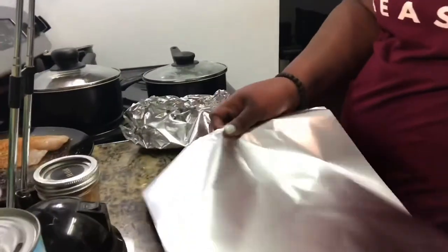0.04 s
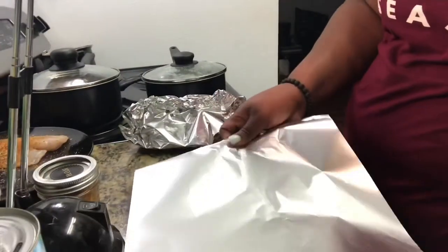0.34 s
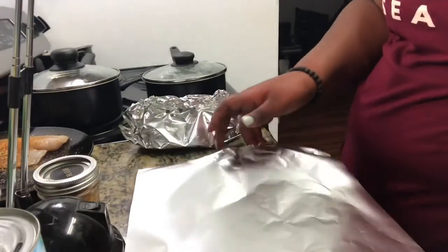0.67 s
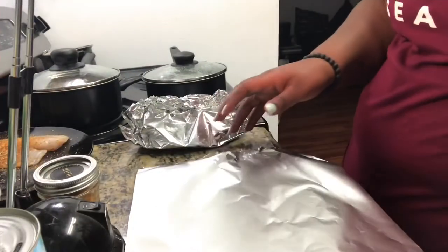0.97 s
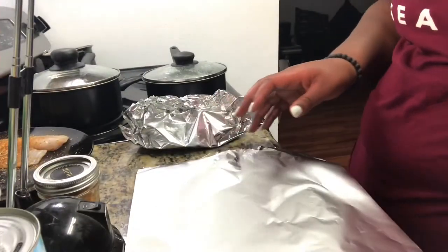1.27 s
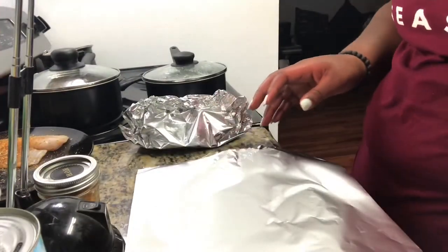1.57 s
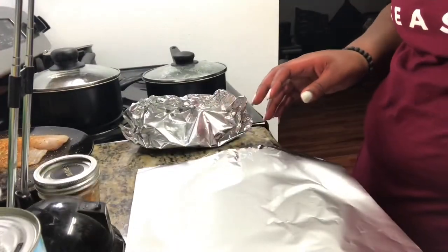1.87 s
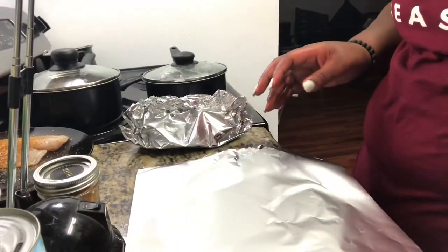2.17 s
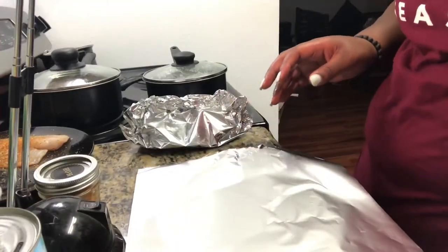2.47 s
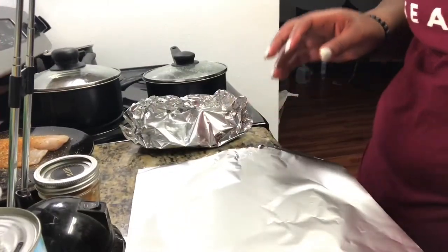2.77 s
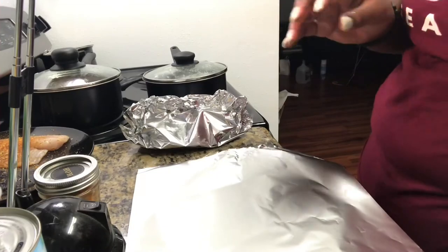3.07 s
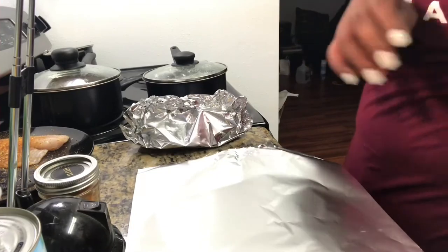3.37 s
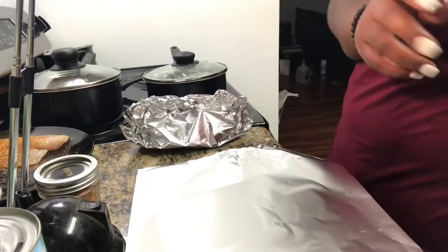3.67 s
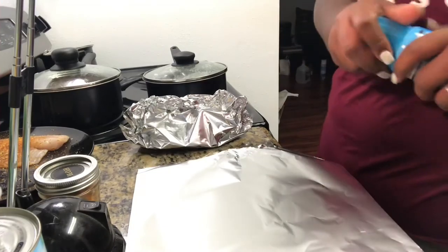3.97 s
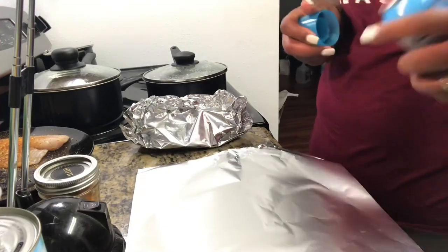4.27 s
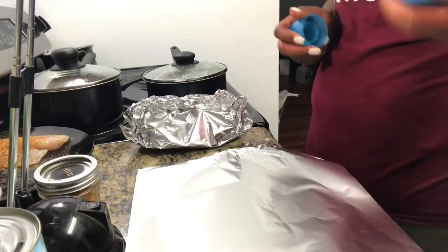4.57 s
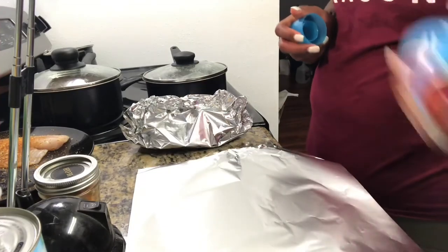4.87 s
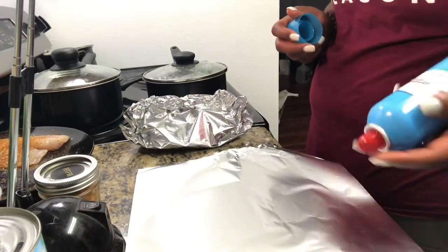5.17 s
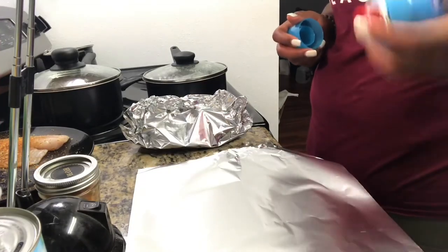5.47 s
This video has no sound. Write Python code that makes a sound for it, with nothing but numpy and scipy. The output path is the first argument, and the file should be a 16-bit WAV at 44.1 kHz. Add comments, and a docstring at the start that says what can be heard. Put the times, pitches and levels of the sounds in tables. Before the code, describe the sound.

A sheet of aluminium foil crinkles in dense, bright snaps as it is laid on a kitchen counter, then rustles and settles. Hard things knock and scrape as a spray can is fetched. Its plastic cap pops off, and the can is swung a few times, liquid swishing inside and the thin metal ticking in the hand. Everything is close, in a small room with a faint fridge hum.

```python
"""A sheet of aluminium foil is laid on a kitchen counter: its creases buckle in dense flurries of snaps,
then it rustles and settles. Hard things knock and scrape as a can of cooking spray is fetched. The cap
pops off and the can is swung: liquid swishes against its wall and the thin metal ticks in the hand.
A fridge hums behind it all, and the small room adds a short reverberation to the handling sounds."""
import sys
import numpy as np
from scipy import signal
from scipy.fft import rfft, irfft, next_fast_len
from scipy.io import wavfile

SR = 44100
rng = np.random.default_rng(int(sys.argv[2]) if len(sys.argv) > 2 else 0)


def digitize_waveform(pressure):
    """Quantize a signal to 16-bit integers and store it at the path in sys.argv[1].

    Rows of a 2-D input are taken as channels; values are limited to [-1, 1].
    """
    field = np.atleast_2d(pressure).T
    bounded = np.clip(field, -1, 1)
    quanta = np.round(bounded * 32767).astype(np.int16)
    wavfile.write(sys.argv[1], SR, quanta)


N = 248283
T = np.arange(N) / SR
AGE = T[:SR // 2]  # seconds since the onset of one event
TOP_HZ = 16200
# Spectrum of a hard contact: frequency_hz, gain_db
CONTACT_SPECTRUM = [(200, -6), (700, 8.5), (1800, 3.5), (3200, 2.5), (6500, -5.5), (10000, -19),
                    (16000, -25)]


def amp(db):
    """Decibels to amplitude ratio."""
    return 10 ** (np.asarray(db) / 20)


def unit(x):
    """Normalisation to rms 1."""
    return x / np.sqrt(np.mean(x ** 2))


def add(out, start_s, x):
    """Superposition of x on out from start_s."""
    i = max(int(start_s * SR), 0)
    out[i:i + len(x)] += x[:N - i]


def fade(t60):
    """Exponential decay, 60 dB down after t60 seconds."""
    return np.exp(-np.log(1000) * AGE / max(t60, 1 / SR))


def swell(length_s):
    """Half-sine envelope."""
    return np.sin(np.pi * np.minimum(AGE / length_s, 1))


def ring(hz, t60):
    """Free vibration of one damped mode."""
    return np.sin(2 * np.pi * hz * AGE) * fade(t60)


def noise():
    """Half a second of white noise."""
    return rng.standard_normal(len(AGE))


def grains(count, rate, spread_db):
    """Shot noise: count samples holding random clicks of unequal size, rate a second."""
    size = amp(spread_db * np.minimum(rng.exponential(size=count), np.pi))
    occurs = rng.random(count) < rate / SR
    return unit(occurs * rng.choice([-1, 1], count) * size)


def between(hz, points):
    """Interpolation of (frequency, value) points on a logarithmic frequency axis."""
    frequency, value = np.transpose(points)
    return np.interp(np.log(hz + 1), np.log(frequency), value)


def colour(x, spectrum, size=8192):
    """Minimum-phase filter with the given spectrum, made causal by folding the cepstrum."""
    gain = amp(between(np.fft.rfftfreq(size, 1 / SR), spectrum))
    cepstrum = irfft(np.log(gain))
    cepstrum[1:size // 2] *= 2
    cepstrum[size // 2 + 1:] = 0
    return signal.fftconvolve(x, irfft(np.exp(rfft(cepstrum))))[:len(x)]


def band(x, low_hz, high_hz, order=2):
    """Band-pass filter."""
    sos = signal.butter(order, [low_hz, min(high_hz, SR / 2 - 1)], "band", fs=SR, output="sos")
    return signal.sosfilt(sos, x)


def shade(x, low_db, treble_db, low_hz=2400, treble_hz=8000):
    """Shelving filters: x is normalised, then its lows and treble are raised or lowered."""
    x = unit(x)
    low = signal.sosfiltfilt(signal.butter(2, low_hz, "low", fs=SR, output="sos"), x)
    treble = signal.sosfiltfilt(signal.butter(2, treble_hz, "high", fs=SR, output="sos"), x)
    return x + (amp(low_db) - 1) * low + (amp(treble_db) - 1) * treble


def resonate(x, modes, ring_db):
    """Forced vibration: a noise plus the ringing it sustains in a body, at rms 1."""
    body = sum(amp(db) * ring(hz, t60) for hz, db, t60 in modes)
    ringing = unit(signal.fftconvolve(x, body)[:len(x)])
    return unit(unit(x) + amp(ring_db) * ringing)


def clatter(hz, t60, loose, blur=0.017):
    """Line broadening: a loose contact turns part of a mode into narrow-band noise just below it."""
    centre_hz = hz * 0.925
    rough = unit(band(noise(), centre_hz / (1 + blur), centre_hz * (1 + blur), order=1))
    return (1 - loose) * ring(hz, t60) + loose * rough * fade(t60)


def crack(t60):
    """Impact transient: a brief, hard contact radiates a broadband burst."""
    return unit(colour(noise(), CONTACT_SPECTRUM)) * fade(t60) / 2


def room(x, wet_db, linger=1):
    """Reverberation: direct sound plus a diffuse tail, whose decay times are scaled by linger."""
    # Reverberation times of the kitchen: frequency_hz, t60_s
    decay_times = [(100, 0.34), (500, 0.22), (2500, 0.3), (7000, 0.22), (16000, 0.11)]
    edges_hz = np.geomspace(120, 20000, 8)
    diffuse = noise()
    tail = sum(band(diffuse, low, high) * fade(linger * between(np.sqrt(low * high), decay_times))
               for low, high in zip(edges_hz, edges_hz[1:]))
    tail *= np.clip((AGE - .002) / .003, 0, 1)  # the nearest surfaces answer after a few ms
    return x + amp(wet_db) * signal.fftconvolve(x, tail / np.linalg.norm(tail))[:N]


def fridge(air_db=-56.5, waver_db=2):
    """Periodic vibration gives a line spectrum: a slightly wavering hum over the rush of the room."""
    # Spectrum of the room's rush: frequency_hz, gain_db
    air_spectrum = [(20, -10), (45, -14), (70, -10), (150, -6.5), (210, -12), (350, -5.5), (560, -18.5),
                    (1050, -19), (1600, -24), (2900, -27), (5400, -31), (7500, -35), (10500, -41),
                    (16000, -40.5)]
    # Mains and compressor tones: pitch_hz, level_db
    hum_lines = [(59.5, -58.5), (120, -64.5), (156.2, -63.5), (292, -76.5), (361, -71.5)]
    out = amp(air_db) * unit(colour(rng.standard_normal(N), air_spectrum))
    knots_s = np.linspace(0, T[-1], 24)
    for hz, db in hum_lines:
        waver = np.interp(T, knots_s, rng.standard_normal(len(knots_s)))
        tone = np.sqrt(2) * np.sin(2 * np.pi * (hz * T + rng.random()))
        out += amp(db + waver_db * waver) * tone
    return out


def knocks():
    """Impact and friction excite the modes of small hard things; the wood thuds under each impact."""
    # Things set down: start_s, ring_db, ring_hz, crack_db, thud_db, thud_hz
    impacts = [(1.2847, -34, 1700, -31.5, -25.5, 233), (1.457, -51, 1100, -32, -28.5, 132),
               (1.675, -41, 980, -30, -37.5, 480), (1.732, -19.5, 1440, -26, -31.5, 362),
               (1.928, -33, 1174, -32.5, -37.5, 304), (1.956, -45, 1110, -36, -25, 291),
               (1.987, -32, 2020, -24, -40, 403), (1.9928, -20.5, 2040, -19.5, -33.5, 383),
               (2.241, -19, 1265, -31, -41, 315), (2.288, -38, 3080, -31.5, -36, 110),
               (2.791, -48, 1526, -24.5, -26.5, 379), (2.83, -34.5, 1150, -36.5, -27.5, 291),
               (2.868, -31, 1140, -43, -33.5, 387), (3.195, -62, 1100, -64, -37, 518)]
    # Modes of a struck thing: pitch_ratio, gain_db
    clack_modes = [(.66, -27), (1, -1), (1.17, -4.5), (2.2, -18)]
    # Things sliding on each other: start_s, level_db, pitch_hz, length_s
    scrapes = [(1.274, -54, 2130, 0.2), (1.554, -50.5, 1480, 0.13), (1.738, -56, 2260, 0.057),
               (1.926, -54.5, 2160, 0.076), (2.234, -52, 2520, 0.088), (3.05, -57.5, 2240, 0.069),
               (4.084, -64.5, 1870, 0.11), (4.227, -62.5, 1860, 0.15)]
    # Modes of a sliding thing: pitch_hz, gain_db, t60_s
    slide_modes = [(1220, 7, 0.013), (1937, -5, 0.086), (2420, 5, 0.016), (3065, 2, 0.046),
                   (3520, -6, 0.055)]
    out = np.zeros(N)
    for start_s, ring_db, hz, crack_db, thud_db, thud_hz in impacts:
        modes = sum(amp(db) * clatter(hz * ratio, t60=0.024, loose=0.53, blur=0.034)
                    for ratio, db in clack_modes)
        clack = amp(ring_db) * modes * (1 - fade(0.0044)) + amp(crack_db) * crack(t60=0.02)
        add(out, start_s, band(clack, 0.58 * hz, TOP_HZ))  # little radiates below the modes
        t60 = 0.088 * (300 / thud_hz) ** 0.29  # deeper thuds ring longer
        rumble = unit(band(noise(), thud_hz * 0.41, thud_hz * 1.43))
        thud = 0.52 * ring(thud_hz, t60) + 0.45 * rumble * fade(t60)
        add(out, start_s, amp(thud_db) * thud * (1 - fade(0.019)))
    for start_s, db, hz, length_s in scrapes:
        scrape = resonate(band(noise(), hz * .5, hz * 2.26), slide_modes, ring_db=-3.5)
        add(out, start_s, amp(db) * scrape * swell(length_s))
    return room(out, wet_db=-8.5, linger=0.81)


def fingers(held_s=3, scuff_db=-66, spread_db=3, low_hz=2200, high_hz=9000, count=64):
    """Friction noise: fingers scuff the held can softly, at random moments and pitches."""
    out = np.zeros(N)
    for when, pitch, force in rng.random((count, 3)):
        hz = low_hz * (high_hz / low_hz) ** pitch
        scuff = unit(band(noise(), hz / 1.12, hz * 1.1, order=1)) * swell(length_s=0.014)
        level_db = scuff_db + spread_db * (2 * force - 1)
        add(out, held_s + when * (T[-1] - held_s), amp(level_db) * scuff)
    return out


def splash(peak_s, rise_s, settle_db_per_s=158):
    """Exponential growth, tenfold in each rise_s, then exponential decay as the fizz dies away."""
    rising = 10 ** (np.minimum(T - peak_s, 0) / rise_s)
    settling = amp(-settle_db_per_s * np.maximum(T - peak_s, 0))
    return np.where(T < peak_s, rising, settling)


def can(swish_db=-0.5, spatter_db=-3, grip=0.88):
    """Shell resonance: liquid, rubs and ticks excite the can's thin wall; the grip damps the ticks."""
    # Modes of the metal wall: pitch_hz, gain_db, t60_s
    wall_modes = [(1360, -4.5, 0.037), (1580, -5.5, 0.029), (1940, -7.5, 0.057), (2446, -1.5, 0.026),
                  (3290, -16.5, 0.083), (3700, -0.5, 0.012), (4200, -16.5, 0.065), (4570, 1.5, 0.024),
                  (6980, -4.5, 0.026)]
    # Spectrum of the liquid: frequency_hz, gain_db
    liquid_spectrum = [(500, -33), (900, -17), (1280, -1), (1550, -9), (2150, -1.5), (2900, -6.5),
                       (3800, 0), (5000, -3), (6700, -4), (9500, -8.5), (16000, -10)]
    # Swings throwing the liquid at the wall: peak_s, level_db, rise_s, treble_db
    swings = [(4.53, -67, .05, 6), (4.68, -53, 0.054, -7), (4.78, -51.5, .06, -3), (4.93, -55.5, 0.062, -5),
              (5.12, -60, 0.058, -5), (5.43, -74, 0.066, 11), (5.523, -50.5, 0.015, 3.5),
              (5.61, -76, 0.0081, 21)]
    # Spectrum of finger friction: frequency_hz, gain_db
    rub_spectrum = [(1000, -24.5), (2400, -12), (3100, -12), (3800, 2.5), (4400, -3), (5400, -7),
                    (7000, -9), (10000, -21.5), (16000, -23)]
    # Fingers rubbing the can: start_s, level_db, treble_db, length_s
    rubs = [(1.463, -33, -2.5, 0.021), (3.408, -52, 9, 0.028), (3.555, -48.5, 10, 0.05),
            (3.701, -51.5, -17, 0.028), (3.728, -57, 0, 0.088), (4.857, -54.5, 11.5, 0.035),
            (5.053, -43, 3, 0.023)]
    # Ticks of the can in the hand: start_s, level_db, relative_crack_db
    ticks = [(3.766, -49, 3), (4.861, -53.5, 18), (4.913, -40.5, -6), (5.0556, -27, -9.5), (5.078, -42, 7),
             (5.236, -40, -0.5), (5.349, -56, 8), (5.512, -45, -10)]
    fizz = resonate(colour(grains(N, rate=2700, spread_db=0.5), liquid_spectrum), wall_modes, -10)
    spatter = resonate(colour(grains(N, rate=98, spread_db=3), liquid_spectrum), wall_modes, -7.5)
    liquid = fizz + amp(spatter_db) * spatter
    out = fingers()
    for peak_s, db, rise_s, treble_db in swings:
        out += amp(db + swish_db) * splash(peak_s, rise_s) * shade(liquid, 0, treble_db)
    for start_s, db, treble_db, length_s in rubs:
        friction = colour(grains(len(AGE), rate=1900, spread_db=4.5), rub_spectrum)
        rasp = resonate(friction, wall_modes, ring_db=-5)
        add(out, start_s, amp(db) * shade(rasp, 0, treble_db) * swell(length_s))
    for start_s, db, crack_db in ticks:
        shell = sum(amp(mode_db) * clatter(hz, t60 * grip, loose=0.76)
                    for hz, mode_db, t60 in wall_modes)
        click = amp(crack_db) * band(noise(), 2500, 10600) * fade(0.02)
        add(out, start_s, amp(db) * (shell + click) / 2)
    return room(out, wet_db=-10.5)


def cap(pop_s=4.083, slip_s=0.009, slip_hz=2350, squeak_db=-40, rasp_db=-38, snap_db=-25):
    """Sudden release of strain: the plastic cap squeaks over the rim, snaps free, and the air pops."""
    # Modes of cap and can at release: delay_s, pitch_hz, level_db, t60_s
    pop_modes = [(.001, 151, -27.5, 0.083), (.003, 372, -12, 0.019), (.003, 516, -32, 0.043),
                 (.003, 740, -23, 0.023), (.003, 823, -30.5, 0.031), (.009, 985, -23.5, 0.046),
                 (.003, 1236, -41, 0.12), (0, 2270, -34, 0.045), (0, 3930, -44, .03), (0, 5540, -28, 0.03),
                 (0, 7330, -37, 0.031), (0, 9520, -40.5, 0.035)]
    out = np.zeros(N)
    strain = AGE / slip_s * (AGE < slip_s)
    squeak = unit(band(noise(), slip_hz * 0.9, slip_hz * 1.2)) * swell(slip_s)
    rasp = strain * unit(colour(noise(), CONTACT_SPECTRUM))
    add(out, pop_s - slip_s, amp(squeak_db) * squeak + amp(rasp_db) * rasp)
    add(out, pop_s, amp(snap_db) * crack(t60=0.032))
    for delay_s, hz, db, t60 in pop_modes:
        add(out, pop_s + delay_s, amp(db) * clatter(hz, t60, loose=0.25) * (1 - fade(0.0028)))
    return room(out, wet_db=-13)


def snaps(count, rate, spread_db, facets=14, facet_t60=0.027, shimmer=0.17):
    """Snap-through buckling: each snap is an impulse and the brief shimmer of one facet of the foil."""
    # Spectrum of the foil: frequency_hz, gain_db
    foil_spectrum = [(200, -26), (500, -23), (1000, -14.5), (1600, -10.5), (2400, -4.5), (3300, -1.5),
                     (4200, 0.5), (6000, -1.5), (7400, -4), (9000, -9), (10600, -13), (13000, -11.5),
                     (16000, -22)]
    spectrum = 0
    for _ in range(facets):
        response = shimmer * noise() * fade(facet_t60)
        response[0] += 1
        impulses = grains(count, rate / facets, spread_db)
        spectrum = spectrum + rfft(impulses) * rfft(response, count)
    return colour(irfft(spectrum, count), foil_spectrum)


def foil(crinkle_db=1, crease_db=-1, treble_per_db=0.4, neutral_bend_db=-31):
    """Crackling noise: bent foil crinkles, creases yield in avalanches, and the lying sheet rustles."""
    # Bending as the sheet is lowered, pressed and let go: time_s, level_db
    bending = [(0, -23.5), (.05, -28.5), (.125, -23), (.2, -34.5), (.345, -38.5), (.41, -33.5),
               (.53, -35.5), (.6, -43.5), (.97, -49), (1.15, -66.5)]
    # Creases giving way in a run of snaps: start_s, level_db, length_s, treble_db
    creases = [(.003, -21, 0.079, 2), (0.091, -20, 0.02, 0), (.116, -24, .09, 5), (0.2228, -27, .021, -6),
               (0.3368, -21, 0.017, 0), (0.3598, -24.5, 0.099, 6), (0.476, -33, 0.15, 6.5),
               (0.608, -28, 0.03, 6), (.626, -37.5, 0.24, 0), (0.705, -38, 0.052, 2), (0.753, -33, 0.03, 5),
               (.786, -37, .14, -1), (.85, -37, 0.13, -0.5), (.926, -36, .12, 3.5),
               (1.017, -38.5, 0.054, 4.5), (1.89, -49, .01, 10), (1.992, -34, 0.0067, 15.5),
               (2.575, -44.5, 0.067, -6), (2.645, -51.5, 0.028, 2), (2.771, -53.5, 0.15, -6),
               (2.922, -55.5, .055, -2), (3.865, -52, 0.055, -2)]
    # Shifts of the lying sheet: start_s, level_db, length_s, low_db, treble_db
    rustles = [(.98, -60.5, 0.092, 25.5, -16), (1.464, -50.5, 0.19, 13, 2.5), (1.554, -45, 0.11, -12, 3.5),
               (1.685, -59, 0.096, 10, 4), (1.825, -60.5, 0.075, 18.5, 9), (1.908, -56, 0.1, 16.5, 7.5),
               (2.129, -63.5, 0.056, 21.5, 9), (3.31, -63.5, 0.12, -7, 10.5), (3.413, -60.5, 0.071, 8, 10),
               (3.487, -69.5, 0.42, -11, 8), (3.902, -68.5, 0.096, 16.5, 4)]
    times_s, levels_db = np.transpose(bending)
    bend_db = np.interp(T, times_s, levels_db)
    brightness_db = treble_per_db * (bend_db - neutral_bend_db)  # harder bending is brighter
    crinkle = snaps(next_fast_len(N), rate=2400, spread_db=-1)[:N]
    crinkle = shade(crinkle, low_db=-2, treble_db=brightness_db)
    out = amp(bend_db + crinkle_db) * crinkle * (T <= times_s[-1])
    for start_s, db, length_s, treble_db in creases:
        avalanche = shade(snaps(len(AGE), rate=7000, spread_db=-1), low_db=-3, treble_db=treble_db)
        add(out, start_s, amp(db + crease_db) * avalanche * fade(2 * length_s))
    for start_s, db, length_s, low_db, treble_db in rustles:
        rustle = shade(snaps(len(AGE), rate=1800, spread_db=1), low_db, treble_db)
        add(out, start_s, amp(db) * rustle * swell(length_s))
    return room(out, wet_db=-11)


def scene():
    """Superposition of all sources at one point close by, alike in both channels."""
    return np.tile(foil() + knocks() + cap() + can() + fridge(), (2, 1))


def record(dry):
    """Band limiting: a steep low-pass filter removes the treble above TOP_HZ."""
    return signal.sosfilt(signal.ellip(10, .2, 80, TOP_HZ, fs=SR, output="sos"), dry)


dry = scene()
out = record(dry)
digitize_waveform(out)
```